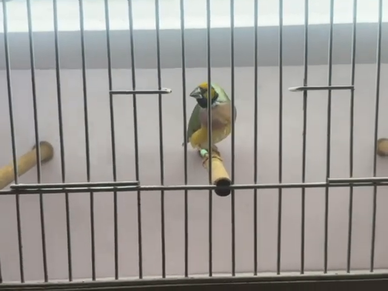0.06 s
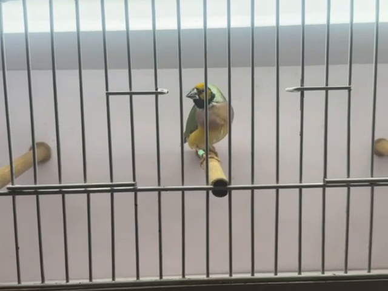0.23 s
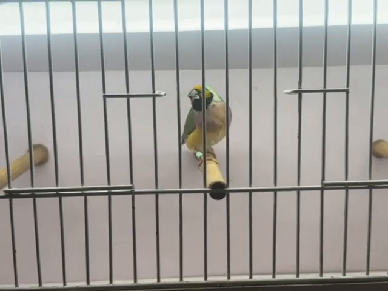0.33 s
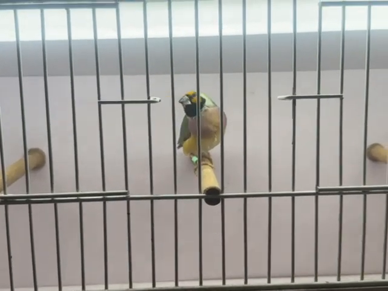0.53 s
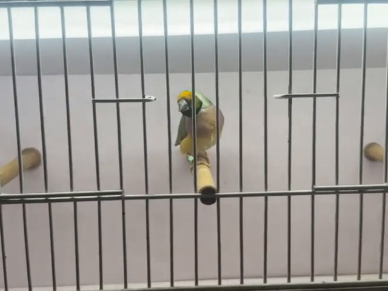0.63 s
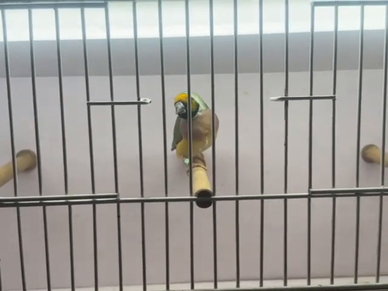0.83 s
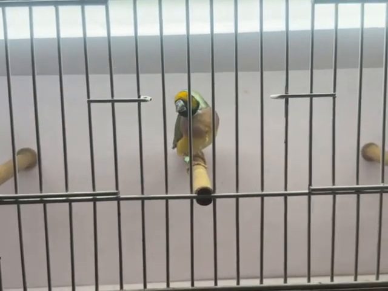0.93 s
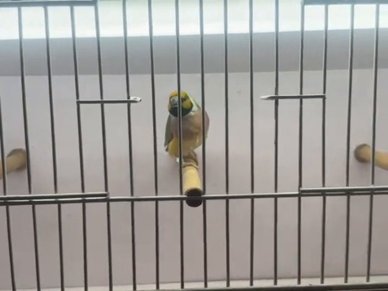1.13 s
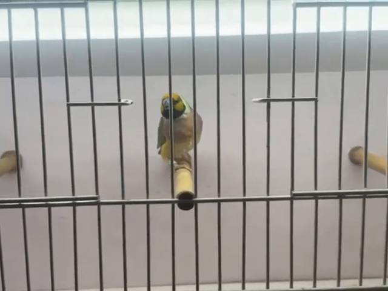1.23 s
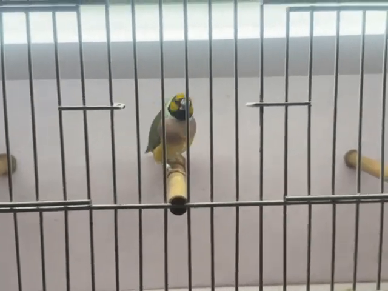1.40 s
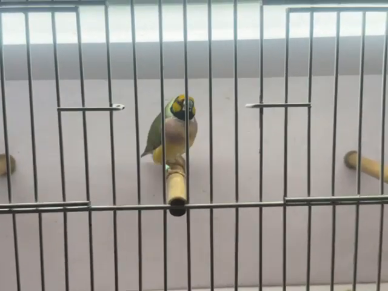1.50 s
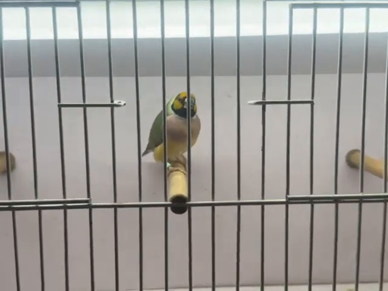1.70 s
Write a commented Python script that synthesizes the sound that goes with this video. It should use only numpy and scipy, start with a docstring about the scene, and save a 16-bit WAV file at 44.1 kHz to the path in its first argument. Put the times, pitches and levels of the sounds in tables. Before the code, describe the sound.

Finch call indoors: one bright, rasping two-toned cheep, followed by a row of quiet downward ticks

```python
"""Caged finch over a motor

A caged finch in a small, hard room gives one loud two-voiced call, then a row of soft falling ticks. The voices
and ticks are phase-integrated tones; faint peeps and cage rattles sound among the ticks. A motor throbs at
multiples of its turning rate while a second machine hums, under the shaped noise of the room. Sparse decaying
reflections carry the bird and cage sounds through the room."""
import sys
import numpy as np
from scipy import signal
from scipy.fft import rfft, irfft
from scipy.io import wavfile

SR = 44100
rng = np.random.default_rng(int(sys.argv[2]) if len(sys.argv) > 2 else 0)


def generate_wav(sig):
    """Save sig (samples, or channels by samples) to the path in sys.argv[1] as 16-bit PCM at SR."""
    pcm = np.round(np.clip(np.atleast_2d(sig).T, -1, 1) * 32767).astype(np.int16)
    wavfile.write(sys.argv[1], SR, pcm)


N = 77175
TIME = np.arange(N) / SR  # [s]

# Lower voice of the syrinx: (time [s], pitch before buzz [Hz], relative level [dB], buzz [0-1])
LOW_VOICE = [(.073, 2223, -44, 0), (.080, 2292, -27, 0.06), (.097, 2273, -29.5, 0.41),
             (.108, 2440, -20.5, 1), (.116, 2086, -22, 0), (.124, 2028, -24.5, 0.16),
             (.137, 2129, -23, 0.5), (.149, 2142, -15.5, 0.29), (.155, 2553, -17, 0.26),
             (.166, 2686, -15.5, 0.23), (.192, 2918, -24, 0.61), (.225, 3109, -18, 0.79),
             (.27, 3184, -17.5, 0.9), (.30, 3213, -19.5, 0.48), (.325, 3224, -24, 0.34),
             (.338, 3250, -37.5, 0.5), (.362, 3420, -49, 0.53), (.372, 3300, -61, 0.3)]
# Upper voice of the syrinx: (time [s], pitch before buzz [Hz], relative level [dB], buzz [0-1])
HIGH_VOICE = [(.134, 3660, -26, 0.9), (.143, 3813, -12.5, 0.02), (.158, 3725, -13, 0.26),
              (.165, 3960, -14, 1), (.18, 4108, -20, 0.34), (.19, 4071, -11, 0.99), (.205, 4150, -15, 0.98),
              (.217, 4160, -12.5, 0.33), (.25, 4200, -17.5, 0.89), (.293, 4284, -12, 0.23),
              (.315, 4130, -27, 0.43), (.332, 4100, -51, .5)]
# Overtones against the fundamental: (multiple [-], level early in the call [dB], level late [dB])
LOW_OVERTONES = [(2, -2, -4), (3, -12.5, -13.5), (4, -12, -20.5), (5, -27, -44)]
HIGH_OVERTONES = [(2, 4, -12.5)]
# Turbulent air in the call: (frequency [Hz], relative level [dB])
RASP_COLOUR = [(1900, -45), (2300, -27.5), (3000, -0.5), (3600, -0.5), (4200, -5), (4600, -49), (5300, -48),
               (5900, -3.5), (8000, -19), (11000, -10.5), (12500, -34)]
# Falling ticks: (start [s], pitch scale [-], rasp of the head [0-1],
# relative level of head [dB], of body [dB], of tail [dB])
TICKS = [(0.443, 1.07, 0.99, -38, -42, -38), (.606, 1.014, 0.17, -29, -36.5, -34.5),
         (.760, 0.98, 0.38, -31.5, -35.5, -35.5), (0.796, 1.05, 0.82, -35, -42, -39.5),
         (0.918, 1, 1, -35, -36, -37.5), (1.08, 1, 0.28, -26.5, -35.5, -33), (1.245, 1, .15, -27, -34, -36),
         (1.408, 1.02, .4, -37.5, -32, -35), (1.57, 1.017, 0.34, -48, -45.5, -33),
         (1.669, 0.68, 1, -41, -51.5, -50)]
# Sweep shared by the ticks: (time after start [s], pitch before scaling [Hz], relative level [dB])
TICK_SWEEP = [(0, 5258, -23), (.003, 5293, -2), (.010, 4983, -12), (.016, 4446, 5.5), (.024, 4074, 0.5),
              (.032, 3838, 3.5), (.036, 3100, -12.5), (.044, 2728, -6), (.051, 2232, -18.5),
              (.058, 2217, -2.5), (.066, 2314, -18.5)]
# Head, body and tail of a tick: (time after start [s])
TICK_PART_TIMES = [0.0062, 0.02, 0.059]
# Faint short peeps: (start [s], length [s], mean pitch [Hz], relative level [dB])
PEEPS = [(1.117, 0.024, 6860, -53.5), (1.531, 0.037, 4200, -40)]
# Cage rattles: (start [s], relative level [dB], decay to 1/e [s])
RATTLES = [(0.458, -54, 0.016), (0.802, -28.5, 0.0023), (.826, -62, 0.0069), (.925, -72, 0.022)]
# Spectrum of the rattles: (frequency [Hz], relative level [dB])
RATTLE_COLOUR = [(300, -24), (1200, 4), (3000, 8.5), (7000, -3), (11000, 0), (13000, 1)]
# Turning rate of the motor: (time [s], speed [turns/s])
MOTOR_SPEED = [(0, 18.4), (.25, 18.4), (.4, 21), (.62, 18.6), (1.1, 18.65), (1.25, 20), (1.45, 19.2),
               (1.75, 19.1)]
# Swell of the throb: (time [s], relative level [dB])
THROB_LEVEL = [(0, -33.5), (.11, -24.5), (.18, -25.5), (.3, -28), (.45, -41.5), (.59, -43.5), (.625, -25),
               (1.15, -24), (1.3, -24), (1.5, -31), (1.75, -33)]
# Harmonics of the turning rate: (multiple [-], relative level [dB])
THROB_ORDERS = [(3, -57), (4, -2), (5, -3), (6, -27), (7, -17), (8, -26.5), (9, -29.5), (10, -47),
                (12, -27)]
# Steady partials of a second, humming machine: (mean frequency [Hz], relative level [dB])
HUM = [(117.5, -37), (146.8, -37.5), (235, -60.5), (293, -54.5), (520, -61.5), (735, -58.5)]
# Spectrum of the room noise: (frequency [Hz], relative density [dB per Hz])
AIR_COLOUR = [(20, -35), (45, -7.5), (80, 15), (140, 9.5), (190, -4), (290, -6.5), (370, -15.5),
              (520, -12.5), (750, -14.5), (1100, -13), (2800, -19.5), (5000, -24.5), (7500, -30),
              (10000, -32.5), (12000, -46.5)]
# Change of the noise below the split: (time [s], level [dB])
RUMBLE_LEVEL = [(0, 3.5), (.3, -1), (.55, -1.5), (.7, 3.5), (1.2, 0), (1.45, 5), (1.75, 1.5)]
# Change of the noise above the split: (time [s], level [dB])
HISS_LEVEL = [(0, -2), (.55, -2.5), (.7, -0.5), (.82, 1), (.9, -3), (1.15, -2), (1.23, -6), (1.33, 0.5),
              (1.55, 0.5), (1.65, -1.5), (1.75, -1)]
# Reverberation of the room: (frequency [Hz], time to fall 60 dB [s])
ROOM_T60 = [(1000, 0.13), (3000, 0.29), (5000, 0.21), (8000, 0.21), (12000, 0.18)]

# Call
OVERTONES_EARLY_S, OVERTONES_LATE_S = 0.12, 0.24
BUZZ_HZ, BUZZ_WAVER, BUZZ_WAVER_HZ = 131.14, 0.1912, 32.6  # mean rate, its rms share, its bandwidth
BUZZ_DEPTH = 0.0811  # bound of the pitch swing at full buzz, as a share of pitch
BUZZ_PULSING = 0.2  # share of the level that pulses with the buzz
JITTER, JITTER_HZ = 0.784, 206  # random part of the buzz before it saturates, and its bandwidth
LOW_SAG, HIGH_SAG = 0.0013, 0.06  # how far full buzz pulls each voice's pitch down (share)
MIXING_DB, RASP_DB = -5, -15  # gain on the product of the voices; air against the upper voice
# Ticks
TICK_JITTER, HEAD_JITTER = 0.054, 0.078  # rms share of pitch: body; head at full rasp
HEAD_LIFT = 0.085  # raised pitch of the head at full rasp (share)
TICK_OVERTONE_DB = -32
# Motor and air
HUM_WAVER = 0.01225  # rms share of frequency
AIR_DB = -33  # before the two bands swell and sink
# Paths through the room, and the output
DIRECT_DB, TICK_DIRECT_DB = -5.5, -9  # the soft sounds arrive mostly by reflection
TICK_ROOM_DB = 3  # gain of the soft sounds into the room
ROOM_DB, EARLY_DB, EARLY_T60 = -6, -3.5, 0.06  # last one [s]
LIMIT, EDGE_HZ = 0.92, 11850


def amp(db):
    """Logarithmic level: decibels to amplitude gain."""
    return 10 ** (np.asarray(db) / 20)


def unit(x):
    """Normalisation: scales a signal to rms 1."""
    return x / np.sqrt(np.mean(x ** 2) + 1e-20)


def curve(rows, t):
    """Linear interpolation: every column of a table, read at the times t."""
    at, *columns = np.transpose(rows)
    return [np.interp(t, at, column) for column in columns]


def read(points, hz):
    """Logarithmic frequency: a spectrum interpolated on a log axis."""
    f, value = np.transpose(points)
    return np.interp(np.log(hz + 1), np.log(f), value)


def noise(colour):
    """Spectral shaping: white noise weighted to the given spectrum, at rms 1."""
    spectrum = rfft(rng.standard_normal(N))
    gain = amp(read(colour, np.fft.rfftfreq(N, 1 / SR)))
    return unit(irfft(spectrum * gain, N))


def wander(hz):
    """Band-limited chance: noise with a Gaussian roll-off at the given rate, at rms 1."""
    spectrum = rfft(rng.standard_normal(N))
    rolloff = np.exp(-(np.fft.rfftfreq(N, 1 / SR) / hz) ** 2)
    return unit(irfft(spectrum * rolloff, N))


def angle(hz):
    """Phase integration: phase is the running sum of frequency."""
    return 2 * np.pi * np.cumsum(hz) / SR


def voice(rows, overtones, sag):
    """Frequency modulation: one side of the syrinx, a buzzing whistle whose overtones weaken."""
    hz, db, buzz = curve(rows, TIME)
    cycle = angle(BUZZ_HZ * (1 + BUZZ_WAVER * wander(BUZZ_WAVER_HZ)))
    flutter = BUZZ_DEPTH * np.tanh(0.6 * np.sin(cycle) + JITTER * wander(JITTER_HZ))
    phase = angle(hz * (1 + buzz * (flutter - sag)))

    sounding = (TIME > rows[0][0]) * (TIME < rows[-1][0])
    pulsing = 1 + BUZZ_PULSING * buzz * np.cos(cycle)
    gain = np.sqrt(2) * amp(db) * pulsing * sounding

    upper = 0
    for multiple, early, late in overtones:
        overtone_db = np.interp(TIME, [OVERTONES_EARLY_S, OVERTONES_LATE_S], [early, late])
        upper = upper + amp(overtone_db) * np.sin(round(multiple) * phase)
    return gain * np.exp(1j * phase), gain * upper


def call():
    """Nonlinear mixing: the product of the two complex voices adds a sum tone; air adds rasp."""
    low, low_upper = voice(LOW_VOICE, LOW_OVERTONES, LOW_SAG)
    high, high_upper = voice(HIGH_VOICE, HIGH_OVERTONES, HIGH_SAG)
    sum_tone = amp(MIXING_DB) * low * high
    rasp = amp(RASP_DB) * abs(high) * noise(RASP_COLOUR)
    return (low + high + sum_tone).imag + low_upper + high_upper + rasp


def ticks():
    """Frequency sweep: rough whistles drop over an octave, with little pitch scatter at the end."""
    out = np.zeros(N)
    for start, scale, rasp, *levels_db in TICKS:
        t = TIME - start
        hz, db = curve(TICK_SWEEP, t)
        scatter = [HEAD_JITTER * rasp, TICK_JITTER, 0.27 * TICK_JITTER]
        rough = np.interp(t, TICK_PART_TIMES, scatter)
        lift = np.interp(t, TICK_PART_TIMES, [HEAD_LIFT * rasp ** 2, 0, 0])
        phase = angle(hz * scale * (1 + lift + rough * wander(531)))

        sounding = (t > 0) * (t < TICK_SWEEP[-1][0])
        gain = amp(db + np.interp(t, TICK_PART_TIMES, levels_db)) * sounding
        out += gain * (np.sin(phase) + amp(TICK_OVERTONE_DB) * np.sin(2 * phase))
    return np.sqrt(2) * out


def peeps():
    """Windowed tones: faint whistles of wavering pitch under half-sine envelopes."""
    out = np.zeros(N)
    for start, length, hz, db in PEEPS:
        envelope = np.sin(np.pi * np.clip((TIME - start) / length, 0, 1))
        phase = angle(hz * (1 + 0.028 * wander(240)))
        out += amp(db) * envelope * np.sin(phase)
    return out


def rattles():
    """Exponential decay: small dry scrapes in the cage, as dying bursts of coloured noise."""
    envelope = np.zeros(N)
    for start, db, decay in RATTLES:
        envelope += amp(db) * (TIME > start) * np.exp(-abs(TIME - start) / decay)
    return noise(RATTLE_COLOUR) * envelope


def motor():
    """Harmonic series: multiples of the turning rate form a throb, over a wavering hum."""
    phase = angle(curve(MOTOR_SPEED, TIME)[0])
    orders = sum(amp(db) * np.cos(round(multiple) * phase) for multiple, db in THROB_ORDERS)
    throb = amp(curve(THROB_LEVEL, TIME)[0]) * orders

    hum = np.zeros(N)
    for hz, db in HUM:
        hum_phase = angle(hz * (1 + HUM_WAVER * wander(8)))
        hum += amp(db) * np.sin(hum_phase + 2 * np.pi * rng.random())
    return np.sqrt(2) * (throb + hum)


def air():
    """Band splitting: room noise whose parts below and above 700 Hz swell and sink separately."""
    bed = amp(AIR_DB) * noise(AIR_COLOUR)
    low = signal.sosfiltfilt(signal.butter(2, 700, fs=SR, output="sos"), bed)
    rumble = low * amp(curve(RUMBLE_LEVEL, TIME)[0])
    hiss = (bed - low) * amp(curve(HISS_LEVEL, TIME)[0])
    return rumble + hiss


def room(x):
    """Convolution: quick reflections from the cage walls, and a frequency-dependent room tail."""
    t = np.arange(SR // 2) / SR
    signs = rng.choice([-1., 1.], (2, len(t)))
    sparse = rng.random((2, len(t))) < 0.06
    near, far = signs * sparse * (t > 0.001)
    early = near * amp(-60 * t / EARLY_T60)

    # the tail builds up over 14 ms, then each frequency dies at its own rate
    hz, at, z = signal.stft(far * np.minimum(t / 0.014, 1), SR, nperseg=256)
    decay = amp(-60 * at / read(ROOM_T60, hz)[:, None])
    tail = signal.istft(z * decay, SR, nperseg=256)[1][:len(t)]

    early = amp(EARLY_DB) * early / np.linalg.norm(early)
    tail = amp(ROOM_DB) * tail / np.linalg.norm(tail)
    return signal.fftconvolve(x, early + tail)[:N]


def scene():
    """Superposition: direct and reflected sound of bird and cage, over motor and air."""
    loud = call()
    soft = ticks() + peeps() + rattles()
    direct = amp(DIRECT_DB) * loud + amp(TICK_DIRECT_DB) * soft
    reflected = room(loud + amp(TICK_ROOM_DB) * soft)
    return (direct + reflected + motor() + air())[None]


def record(dry):
    """Saturation and band limiting: the highest peaks are rounded, then a low-pass sets the edge."""
    held = dry / (1 + (dry / LIMIT) ** 16) ** (1 / 16)
    lowpass = signal.firwin(201, EDGE_HZ, window=("kaiser", 9), fs=SR)
    return signal.oaconvolve(held, lowpass[None], "same")


dry = scene()
out = record(dry)
generate_wav(out)
```